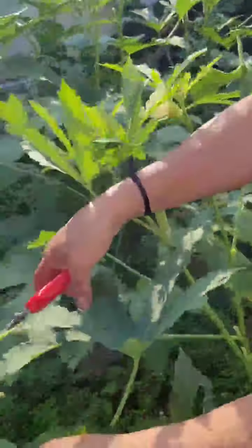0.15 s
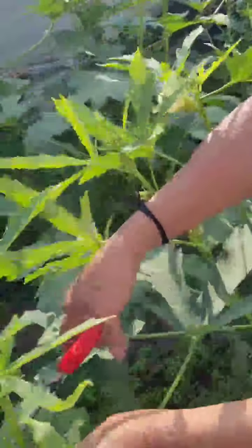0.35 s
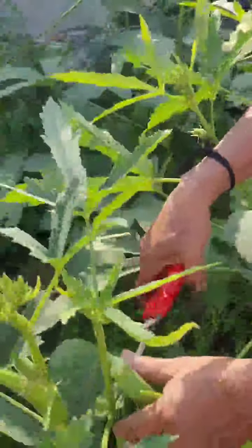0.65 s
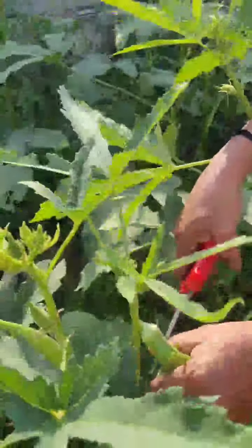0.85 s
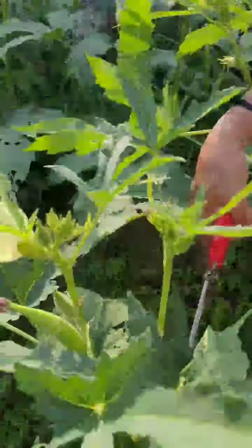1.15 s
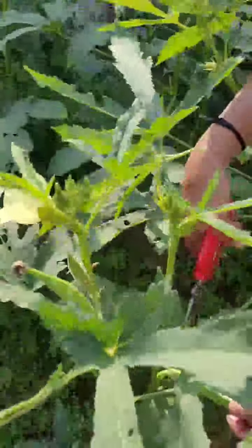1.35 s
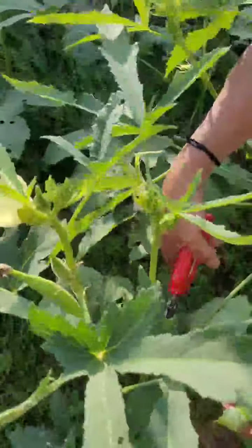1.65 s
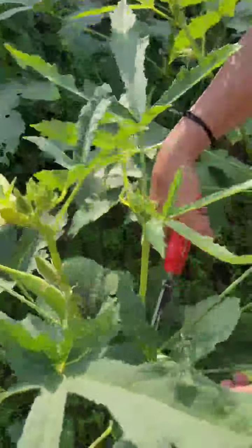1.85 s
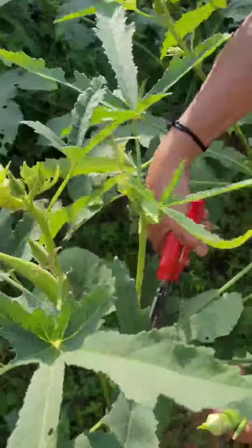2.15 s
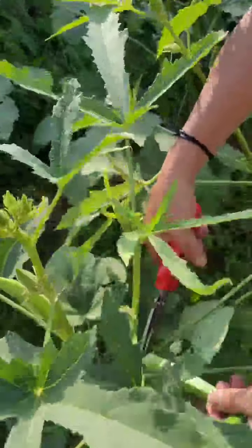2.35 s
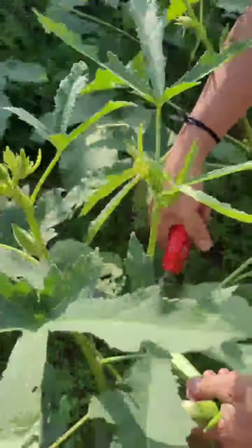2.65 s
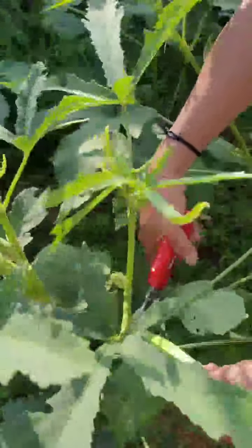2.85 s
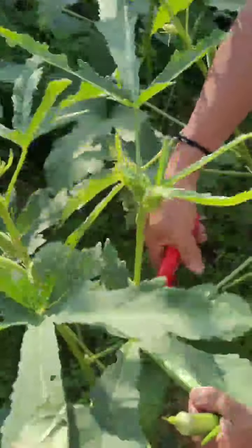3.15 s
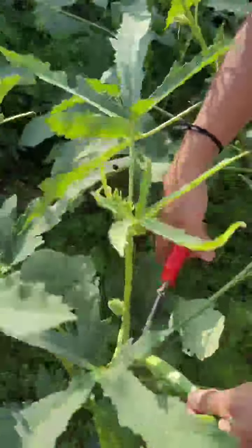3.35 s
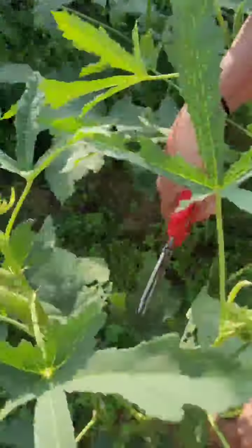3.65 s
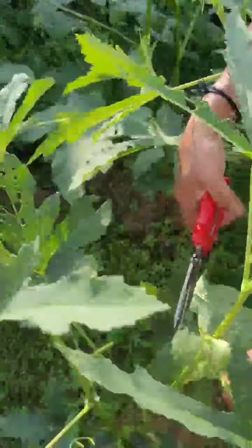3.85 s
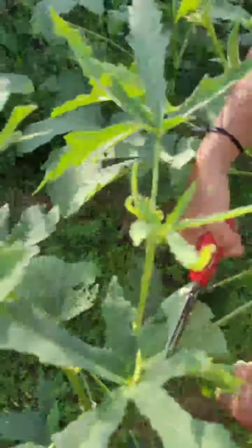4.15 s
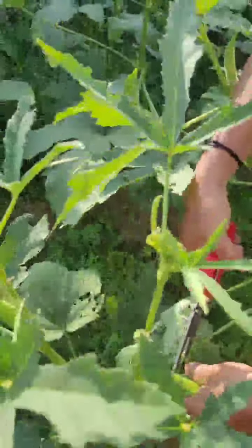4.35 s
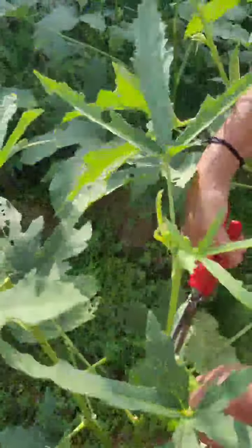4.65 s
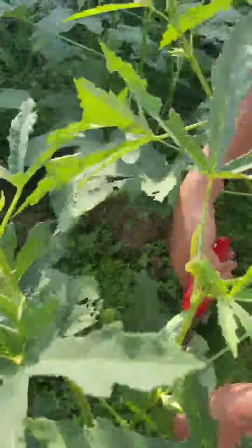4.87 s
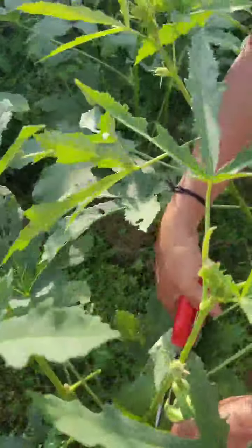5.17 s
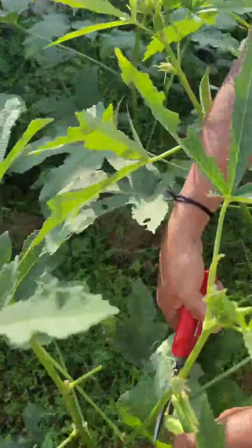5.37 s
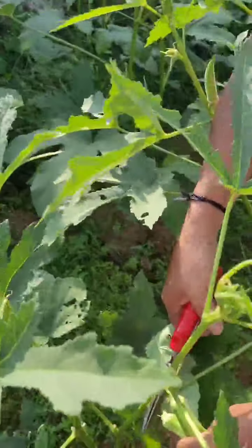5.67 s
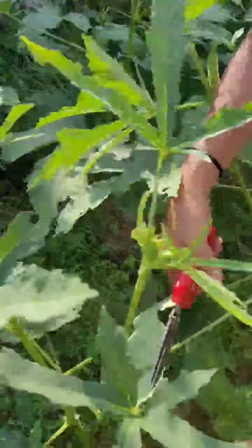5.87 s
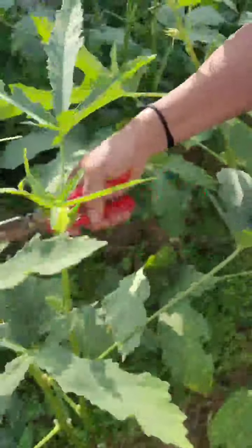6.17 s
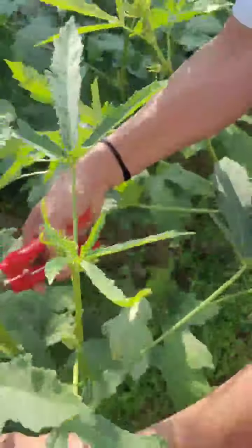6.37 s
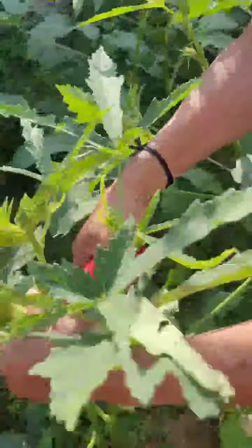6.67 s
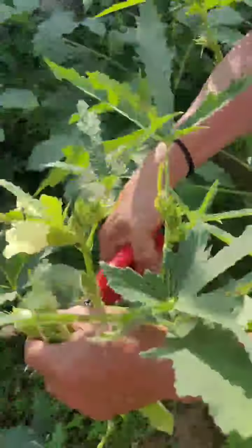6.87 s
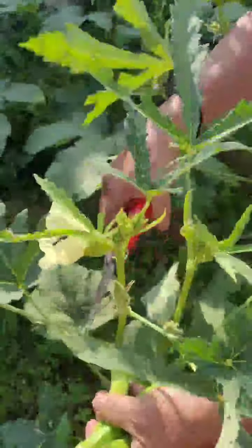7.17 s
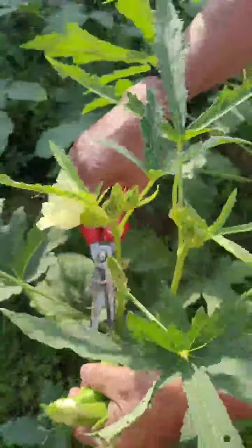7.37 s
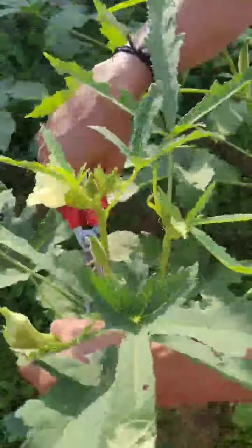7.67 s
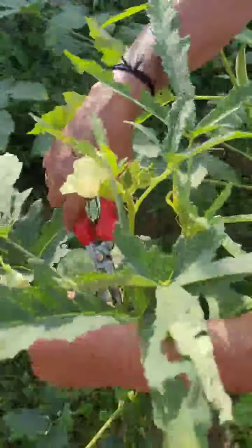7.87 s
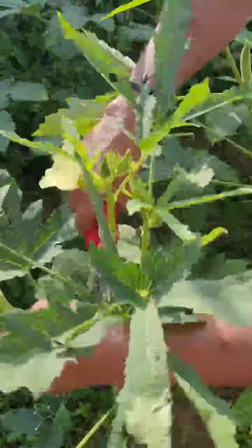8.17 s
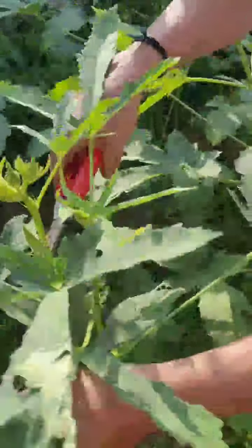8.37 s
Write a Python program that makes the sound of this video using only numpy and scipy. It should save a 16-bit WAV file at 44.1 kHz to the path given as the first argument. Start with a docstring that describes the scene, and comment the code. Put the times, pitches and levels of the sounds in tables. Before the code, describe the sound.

Leaves rustle and flick softly throughout as arms brush through garden plants. Close on the right, hand shears cut pods, each cut a quick clump of sharp, snapping cracks with a brief steel ring. The first comes at about 2.4 seconds, followed by a single click at 2.8 and a sharp snip just after 3. Soft taps of pods and stalks and fuller rustling follow between 3.5 and 5 seconds. A loud, crunchy cut lands at 5.7 seconds and a last one at 8.1. Further off, a small bird repeats a short, high, rising whistle with a slight echo, about a dozen times from 0.4 seconds to the end, with a few fainter calls around 1.5 to 2.3. A low rumble of distant traffic and moving air lies underneath, and a far engine hums for the first three seconds.

```python
"""Sharp cracks and clicks come from close on the right: hand shears are cutting pods in a garden.
Each cut is a clump of snapping stem fibres with a short ring from the steel blades.
Arms brush the leaves, which hiss and flick, and pods and stalks tap softly.
A small bird repeats a rising whistle that the garden walls throw back.
Behind it all is a low rumble of traffic and moving air, with a far engine humming early on."""
import sys
import numpy as np
from scipy import signal
from scipy.fft import rfft, irfft
from scipy.io import wavfile
from scipy.ndimage import uniform_filter1d

SR = 44100
rng = np.random.default_rng(int(sys.argv[2]) if len(sys.argv) > 2 else 0)


def master(y):
    """Save y as 16-bit WAV."""
    cut = np.clip(np.atleast_2d(y).T, -1, 1)
    pcm = np.round(cut * 32767)  # scale
    wavfile.write(sys.argv[1], SR, pcm.astype(np.int16))


N = 375732

# Cracks of the cuts: start_s, length_s, treble_db, body_over_treble_db, middle_over_treble_db
CUTS = [(2.3104, 0.00081, -36, -10.5, -2.5), (2.3344, .0051, -45.5, -9, -6), (2.352, .0017, -52, -4, 0),
        (2.36, 0.0024, -50, -1, -1), (2.369, 0.025, -59, 0.5, -3), (2.3949, .0038, -38, -5, 0),
        (2.398, 0.0055, -40, -2, 4), (2.4153, 0.0028, -30, -3.5, -2.5), (2.4184, 0.003, -38, -18, -19),
        (2.789, 0.0014, -25.5, -23.5, -5), (2.976, 0.0018, -70.5, 17, 16.5),
        (3.021, 0.0048, -53.5, 3.5, 4.5), (3.0333, 0.0019, -39, -7.5, -6.5),
        (3.051, 0.011, -42.5, -12, -4.5), (3.0648, 0.0012, -17, -8.5, -11.5),
        (3.067, 0.013, -49, -12, -1.5), (3.1987, 0.0036, -45, -4.5, -5.5), (3.232, 0.01, -67, 10, -6),
        (3.259, 0.004, -59, 2, -5), (3.3155, 0.0022, -60.5, 6, 2.5), (5.632, .002, -54, -25, -9),
        (5.649, .003, -39.5, -9.5, -10), (5.657, .0012, -45, -21.5, -15),
        (5.6716, 0.0019, -28.5, -22.5, -21.5), (5.675, 0.0023, -29.5, -18.5, -16.5),
        (5.6835, 0.0015, -32.5, -12, -14), (5.686, .004, -39, -3, -8), (5.6903, 0.0034, -23, -6, -2.5),
        (5.694, 0.0032, -26, -6, 5.5), (5.698, .0054, -43, -6, -3.5), (8.0705, 0.0022, -53, -26, -12.5),
        (8.104, 0.0057, -41, -5.5, 1), (8.1136, .0015, -20, -11, -3), (8.1159, 0.0065, -30, -9.5, -2),
        (8.122, 0.014, -47, -6, 0)]
# Leaves and stalks flicking: start_s, length_s, treble_db, body_over_treble_db
LEAF_FLICKS = [(.123, 0.0044, -65, 11.5), (0.262, 0.03, -68, 1), (.318, 0.024, -59.5, -1.5),
               (.38, 0.034, -68.5, 0), (.528, .004, -64, -2), (0.891, 0.022, -71, 0),
               (1.04, 0.0041, -53.5, -14), (1.098, 0.032, -62, 1), (1.252, 0.0072, -61, -16),
               (2.999, 0.043, -54, -20), (3.409, .005, -65, -2), (3.714, 0.0051, -60.5, 0),
               (3.834, 0.0068, -58, -19), (3.908, .004, -56, -12), (4.121, 0.0057, -64, -1),
               (4.386, 0.028, -79.5, 19), (4.634, 0.003, -59.5, -4), (4.847, 0.017, -53.5, -13),
               (4.863, 0.048, -59, -9.5), (5.114, .0085, -59, -9), (5.912, 0.0056, -50.5, -12.5),
               (6.119, .0065, -64, -3.5), (6.542, 0.019, -60, -26), (6.5605, 0.0037, -51, -19.5),
               (6.571, 0.064, -58, -15), (6.71, 0.05, -58, -27), (7.042, .064, -64.5, -13),
               (7.2093, 0.0044, -59.5, -4.5), (7.387, .0063, -67, -24.5), (7.625, 0.025, -65.5, -10.5),
               (7.688, .0094, -63, -16), (8.208, 0.0069, -72, 4.5)]
# Resonances (favoured pitches) of a crack's four ranges, low to high: pitch_hz, width_hz, gain_db
STEM_KNOCK = [(231, 165, 0.5), (430, 280, 0.5), (753, 640, -9.5)]
CRACK_BODY = [(1678, 1340, -1), (2610, 1430, 3)]
CRACK_MIDDLE = [(3120, 960, 1), (4126, 510, 4), (4930, 1400, -1), (6970, 510, 3), (7940, 960, 1.5)]
CRACK_TREBLE = [(11310, 2950, -1.6), (12800, 3270, 0.65), (14400, 2130, -1)]
# Ringing of the steel blades: pitch_hz, gain_db, rough_ring_time_s
BLADE_RINGS = [(3630, -4, .02), (6430, -9.5, .03), (12100, -12.5, 0.034)]
# Soft taps of pods and stalks: start_s, level_db, pitch_hz
POD_TAPS = [(0.123, -55, 589), (0.525, -43, 452), (4.128, -37.5, 710), (4.749, -41, 474), (4.89, -41, 790)]
# Tone colour of rubbed leaves: pitch_hz, level_db
LEAF_COLOUR = [(530, -29), (900, -3.5), (968, -11.5), (1500, -7), (1720, -8), (2080, -10), (3350, -6),
               (7040, -5), (8660, -11.5), (12900, -5), (15700, -7), (16500, -27)]
# Steady stir of the leaves (body is the range near 2 kHz): time_s, treble_db, body_db
LEAF_STIR = [(0, -93.5, -61), (.45, -81.5, -75.5), (1.44, -73.5, -76.5), (2.61, -73.5, -80.5),
             (3.3, -67, -68), (4.6, -67.5, -69), (5.1, -67, -68.5), (5.4, -73, -80.5), (6.359, -72.5, -84),
             (6.999, -71, -75), (7.501, -79.5, -84.5), (8.52, -67.5, -73.5)]
# An arm brushing through the leaves: start_s, hold_s, treble_db, body_db
ARM_BRUSHES = [(0, 0.025, -60, -69), (0.318, 0.025, -59.5, -61.5), (0.54, 0.1, -64, -72.5),
               (1.03, 0.032, -62.5, -68), (2.403, 0.019, -68, -70.5), (2.99, 0.021, -67, -66.5),
               (3.473, 0.14, -64.5, -63), (4.028, 0.018, -57.5, -58.5), (4.297, 0.038, -64.5, -65),
               (4.76, 0.14, -68, -64.5), (5.935, 0.13, -61, -66), (6.587, 0.19, -70.5, -82),
               (8.212, 0.037, -68.5, -81)]
# The path of one rising whistle: time_s, pitch_hz, level_db
WHISTLE_SHAPE = [(0, 3400, -27), (.014, 3650, -14), (.03, 3950, -7), (.065, 4550, 0), (.1, 5050, 1),
                 (.116, 5400, 1.5), (.127, 5800, 0), (.137, 6150, -2), (.15, 6300, -9)]
# The near bird's whistles: start_s, level_db, length_factor, pitch_factor, early_lift_hz
NEAR_WHISTLES = [(.427, -55, 1, 1, 200), (1.735, -54, 1.08, .98, 250), (2.845, -56, 1.12, .94, 300),
                 (3.535, -50, 1.01, .97, 400), (3.945, -50, 1.05, 1, 100), (4.685, -49, 1.04, 1, 200),
                 (5.345, -56, .99, .98, 0), (5.885, -53, 1.05, 1, 100), (6.845, -55, 1.04, 1, 150),
                 (7.622, -56, 1.02, 1.01, 50), (8.007, -53, 1.03, 1, 150), (8.485, -56, 1.03, 1, 0)]
# Faint whistles further off: start_s, length_s, first_hz, last_hz, level_db
FAR_WHISTLES = [(1.48, .14, 2400, 2270, -83), (1.44, .2, 3150, 3050, -83), (1.905, .05, 2300, 2250, -83),
                (2.17, .09, 4100, 5050, -75), (2.25, .05, 4500, 4850, -76)]
# The far engine's hum: time_s, pitch_hz, level_db
ENGINE_HUM = [(0.0, 72.2, -51.5), (0.53, 80.1, -57), (1.8, 80.1, -52.5), (2.45, 82, -56), (2.56, 73.8, -57),
              (3.01, 75.1, -51.5), (3.2, 81.4, -80)]
# Swell of the deepest rumble: time_s, level_db
RUMBLE_SWELL = [(0, -52.5), (.8, -55), (1.349, -53), (1.661, -52), (2.68, -53.5), (3.13, -53.5),
                (3.279, -59), (3.58, -52.5), (4.861, -53), (5.1, -56), (6.36, -57.5), (8.52, -57.5)]
# Tone colour of the rumble: pitch_hz, level_db
RUMBLE_COLOUR = [(12, -49.5), (20, -21), (54, 4), (133, -1.5), (178, -4), (255, -3.5), (347, -11.5),
                 (526, -14), (1400, -34), (1500, -35), (1950, -58.5), (3300, -120)]
# How alike the surrounding noise is in both ears: pitch_hz, likeness (1 is fully alike)
EAR_LIKENESS = [(30, 0.89), (180, 0.99), (330, 0.9), (640, 0.48), (1400, 0.28), (4000, -0.13)]
# Which side that noise leans to: pitch_hz, left_over_right_db
EAR_BALANCE = [(40, -5), (150, -0.5), (300, -2), (600, -7.5), (1300, 1), (2400, -6), (15000, -5.5)]


def crack(length, treble_db, body_db, middle_db, centre_hz, pan_db, ring_db, grain_db, knock_db):
    """A clump of fibre snaps swells and stops, sounding in four ranges from low knock to treble."""
    t, hz = np.arange(4096) / SR, np.fft.rfftfreq(4096, 1 / SR)
    rise = np.clip(t / (0.37 * length), 0, 1)
    fall = amp(-6.1 * t / length - 60 * np.maximum(t - length, 0) / (.002 + .8 * length))
    common, left, right, grain = rng.standard_normal((4, 4096))
    snaps = amp(grain_db * unit_level(uniform_filter1d(grain, size=15))) * rise * fall
    alike = np.clip(1.1 - hz / 9000, .35, .9)  # the ears differ most in the treble
    apart = rfft(np.array([left, right]) * snaps)
    spectrum = alike * rfft(common * snaps) + np.sqrt(1 - alike ** 2) * apart
    spectrum *= amp(np.outer([.5, -.5], pan_db * np.clip(hz / 5000, .35, 1.05)))
    blades = amp(ring_db) * resonances([(f, 2.9 / ring_s, db) for f, db, ring_s in BLADE_RINGS], hz)
    # Where the fibres part decides which pitches sound most.
    favoured = resonances([(centre_hz, 0.26 * centre_hz, 0)], hz)
    knock = resonances(STEM_KNOCK, hz)
    body = resonances(CRACK_BODY, hz) ** 2  # squaring applies the filter twice
    middle = (resonances(CRACK_MIDDLE, hz) ** 2 + blades) * favoured
    treble = resonances(CRACK_TREBLE, hz) ** 2
    parts = [irfft(spectrum * colour) for colour in (knock, body, middle, treble)]
    gains = amp(treble_db + np.array([body_db + knock_db, body_db, middle_db, 0]))
    return sum(gain * part * np.sqrt(length * SR / (part.mean(0) ** 2).sum())
               for gain, part in zip(gains, parts))


def shear_cuts():
    """Stems crack between the blades, and the steel rings on a little."""
    out = np.zeros((2, N))
    for start, *cut in CUTS:
        add(out, start, crack(*cut, centre_hz=5700, pan_db=-9, ring_db=4, grain_db=3, knock_db=-10))
    return out


def leaf_flicks():
    """Leaves and stalks flick or swish: grainier cracks with hardly any ring."""
    out = np.zeros((2, N))
    for start, length, treble_db, body_db in LEAF_FLICKS:
        middle_db = 3.5 + 0.42 * body_db  # more body brings more middle
        centre_hz = 4640 - 64 * body_db  # and a duller sound
        add(out, start, crack(length, treble_db, body_db, middle_db, centre_hz,
                              pan_db=-7, ring_db=-17, grain_db=8, knock_db=1))
    return out


def pod_taps(fade_s=0.017, rise_s=0.0026):
    """Each tap of a pod or stalk is a short, dying wooden tone."""
    out, t = np.zeros(N), np.arange(2000) / SR
    for start, db, hz in POD_TAPS:
        loudness = amp(db - 60 * t / fade_s) * np.minimum(t / rise_s, 1)
        add(out, start, loudness * np.sin(2 * np.pi * hz * t))
    return out * amp([[-2.4], [2.4]])


def leaf_levels(t, rise_db_per_s=92.5, fall_db_per_s=78.5):
    """Treble and body levels in dB: a steady stir plus arm brushes that rise, hold and fade."""
    times, *stir_db = np.transpose(LEAF_STIR)
    power = amp([2 * np.interp(t, times, db) for db in stir_db])
    for start, hold, *peak_db in ARM_BRUSHES:
        before_db = rise_db_per_s * np.maximum(start - t, 0)
        after_db = fall_db_per_s * np.maximum(t - start - hold, 0)
        power += amp(2 * (np.array(peak_db)[:, None] - before_db - after_db))
    return 10 * np.log10(power)


def leaf_rustle(patchy_db=1.5, flicker_db=2.0, tick_db=4.0):
    """Rubbed leaves hiss in drifting patches, with tiny ticks in the treble."""
    hz, t = np.fft.rfftfreq(256, 1 / SR), np.arange(N // 64 + 5) * 64 / SR
    treble_db, body_db = leaf_levels(t)
    colour_db = look_up(LEAF_COLOUR, hz)
    power = amp(2 * colour_db)
    treble_db -= 10 * np.log10(power[hz > 7000].sum())
    body_db -= 10 * np.log10(power[(hz > 1200) & (hz < 3200)].sum())
    treble_share = np.clip(np.log(hz / 2500 + 1e-9) / np.log(7000 / 2500), 0, 1)[:, None]
    patches = uniform_filter1d(rng.standard_normal((len(t), len(hz))).T, size=14, axis=0)
    patches = unit_level(uniform_filter1d(patches, size=30, axis=1))
    flicker = unit_level(uniform_filter1d(rng.standard_normal(len(t)), size=12))
    ticks = np.clip(np.log(.06 / (rng.random(len(t)) + 1e-4)), 0, 3) * treble_share
    smooth_db = colour_db[:, None] + treble_share * treble_db + (1 - treble_share) * body_db
    texture_db = patchy_db * patches + flicker_db * flicker + tick_db * ticks
    return amp(1.45) * surrounding_noise(smooth_db + texture_db, hz, size=256)


def whistle(t, hz, db):
    """A nearly pure tone whose level and pitch flutter quickly and unevenly."""
    level_flutter, pitch_flutter = wobble(rng.standard_normal((len(t), 2)).T, size=110)
    cycles = np.cumsum(hz * (1 + .008 * pitch_flutter)) / SR
    overtone = amp(-33) * np.sin(6 * np.pi * cycles) * (hz < 5300)
    tone = np.sin(2 * np.pi * cycles) + overtone
    return amp(db + 3 * level_flutter) * tone * signal.windows.tukey(len(t), .15)


def birds(lift_s=.11):
    """A small bird repeats its rising whistle, and thin calls come from further off."""
    out = np.zeros(N)
    times, shape_hz, shape_db = np.transpose(WHISTLE_SHAPE)
    for start, db, stretch, pitch_factor, lift_hz in NEAR_WHISTLES:
        t = np.arange(0, times[-1] * stretch, 1 / SR)
        # An arch of extra pitch makes some whistles climb early and linger.
        arch = np.sin(np.pi * np.minimum(t / (lift_s * stretch), 1) ** .7)
        hz = pitch_factor * np.interp(t, times * stretch, shape_hz) + lift_hz * arch
        add(out, start, whistle(t, hz, db + np.interp(t, times * stretch, shape_db)))
    for start, length, first_hz, last_hz, db in FAR_WHISTLES:
        t = np.arange(0, length, 1 / SR)
        add(out, start, whistle(t, first_hz + (last_hz - first_hz) * t / length, db))
    return out[None]


def garden_walls(song):
    """Adds wall echoes. The late ones slowly change, so each whistle has a slightly different tail."""
    early = amp(5) * echoes(song, fade_s=.16, gap_s=.001, swell_s=.002)
    turn = 2 * np.arange(N) / SR
    late = amp(1) * sum(echoes(song * blend, fade_s=.36, gap_s=.01, swell_s=.03)
                        for blend in (np.cos(turn), np.sin(turn)))
    return (song + early + late) * amp([[-3.6], [-1.2]])


def far_engine():
    """An engine's firing makes one low, wavering tone."""
    times, hz, db = np.transpose(ENGINE_HUM)
    t = np.arange(N) / SR
    waver = wobble(rng.standard_normal(N), size=2000)
    cycles = np.cumsum(np.interp(t, times, hz) * (1 + 0.02 * waver)) / SR
    loudness = np.sqrt(2) * amp(np.interp(t, times, db, right=-90))
    return loudness * np.sin(2 * np.pi * cycles) * amp([[-.8], [.8]])


def rumble():
    """Distant traffic and moving air: deep, lumpy noise whose upper part follows its swell a little."""
    hz = np.fft.rfftfreq(2048, 1 / SR)
    colour = amp(look_up(RUMBLE_COLOUR, hz)) * (hz < 2500)
    frames = np.zeros(N // 512 + 5)
    bands_db = [20 * np.log10(colour * band + 1e-9)[:, None] + frames for band in (hz < 160, hz >= 160)]
    deep, upper = [unit_level(surrounding_noise(db, hz, size=2048)) for db in bands_db]
    lumps = wobble(rng.standard_normal(N), size=3000)
    deep_db = np.interp(np.arange(N) / SR, *np.transpose(RUMBLE_SWELL))
    upper_db = -59 + 0.11 * (deep_db - deep_db.mean())
    return deep * amp(deep_db + 1.4 * lumps) + upper * amp(upper_db + 1.6 * lumps)


def echoes(sound, fade_s, gap_s, swell_s):
    """Scattered reflections, different for each ear, that fall 60 dB in fade_s."""
    t = np.arange(SR // 2) / SR
    bounces = rng.choice([-1., 1.], (len(t), 2)).T * (rng.random((len(t), 2)).T < .05)
    bounces *= amp(-60 * t / fade_s) * np.clip((t - gap_s) / swell_s, 0, 1)
    return signal.oaconvolve(sound, bounces / np.linalg.norm(bounces[0]), axes=1)[:, :N]


def surrounding_noise(levels_db, hz, size):
    """Noise shaped by a grid of levels (pitch by time), partly alike in the two ears."""
    a, b, c, d = rng.standard_normal(levels_db.T.shape + (4,)).T
    common, apart = a + 1j * b, c + 1j * d
    alike = np.clip(look_up(EAR_LIKENESS, hz), -1, 1)[:, None]
    lean = amp(look_up(EAR_BALANCE, hz)[:, None] / 2)
    delay = np.exp(-2j * np.pi * hz[:, None] * .00015)  # the left ear hears it a little later
    left = common * delay * lean
    right = (alike * common + np.sqrt(1 - alike ** 2) * apart) / lean
    spectrum = np.array([left, right]) * amp(levels_db)
    return signal.istft(spectrum, nperseg=size, noverlap=size * 3 // 4)[1][:, :N]


def resonances(peaks, hz):
    """A filter that favours a few pitches, one for each row of peaks."""
    return sum(amp(db) * 1j * hz * width / (pitch ** 2 - hz ** 2 + 1j * hz * width) * (-1) ** k
               for k, (pitch, width, db) in enumerate(peaks))


def amp(db):
    """Turns decibels into a gain."""
    return 10 ** (np.asarray(db) / 20)


def unit_level(x):
    """Scales a signal to an average (rms) level of 1."""
    return x / np.sqrt(np.mean(x ** 2) + 1e-20)


def wobble(noise, size):
    """Smooths noise twice over size samples, so it wanders."""
    return unit_level(uniform_filter1d(uniform_filter1d(noise, size), size))


def look_up(table, hz):
    """Reads between a table's rows on a musical (log) pitch scale."""
    pitches, values = np.transpose(table)
    return np.interp(np.log(hz + 1), np.log(pitches + 1), values)


def add(mix, start_s, sound):
    """Mixes a sound in at start_s."""
    part = mix[..., round(start_s * SR):][..., :sound.shape[-1]]
    part += sound[..., :part.shape[-1]]


def scene():
    """Cuts close on the right, a bird further off, leaves and rumble all around."""
    song = birds()
    cracks = shear_cuts() + leaf_flicks()
    early = amp(-9.5) * echoes(cracks, fade_s=.065, gap_s=.00068, swell_s=.0013)
    late = amp(-33) * echoes(cracks, fade_s=.4, gap_s=.01, swell_s=.0093)
    return cracks + early + late + garden_walls(song) + pod_taps() + leaf_rustle() + rumble() + far_engine()


def record(dry):
    """Takes away the highest treble, above 15900 Hz."""
    low_pass = signal.firwin(255, 15900, window=("kaiser", 7), fs=SR)
    return signal.oaconvolve(dry, low_pass[None], "same")


dry = scene()
out = record(dry)
master(out)
```